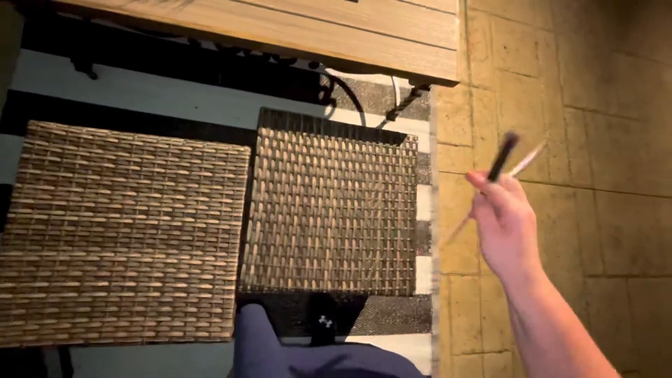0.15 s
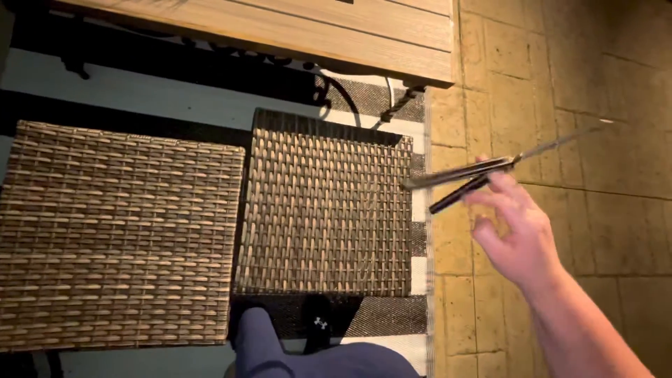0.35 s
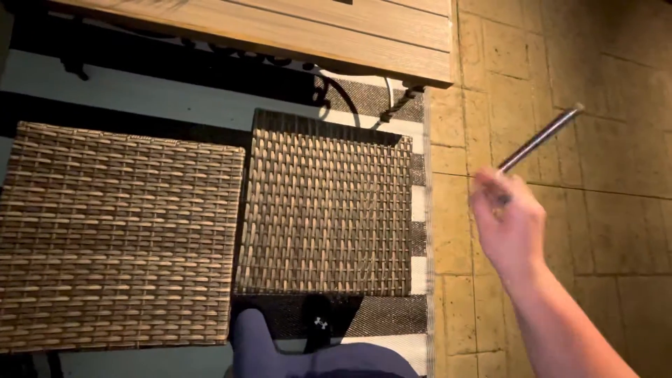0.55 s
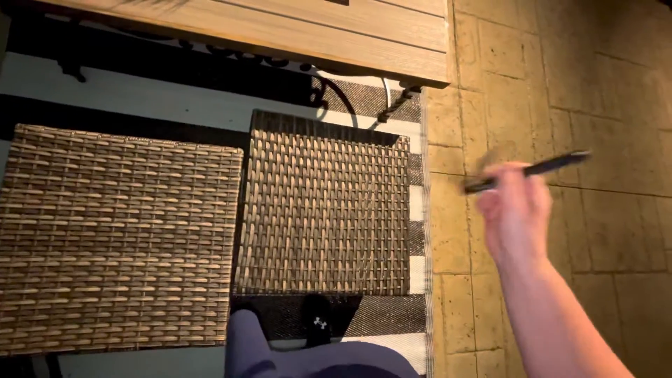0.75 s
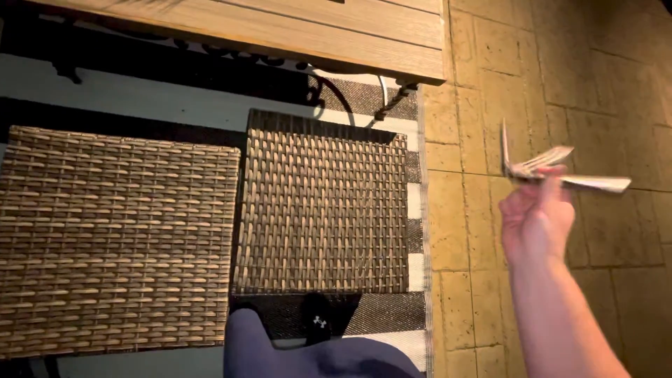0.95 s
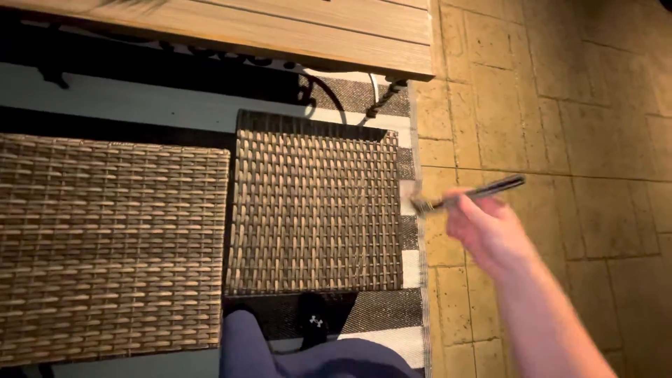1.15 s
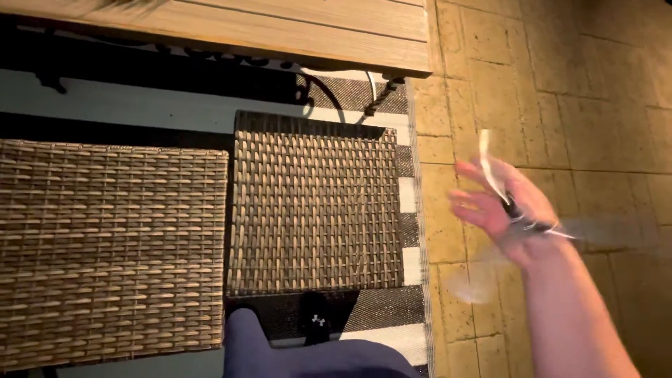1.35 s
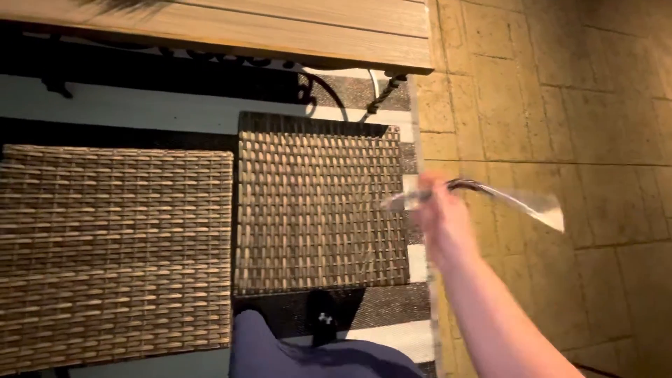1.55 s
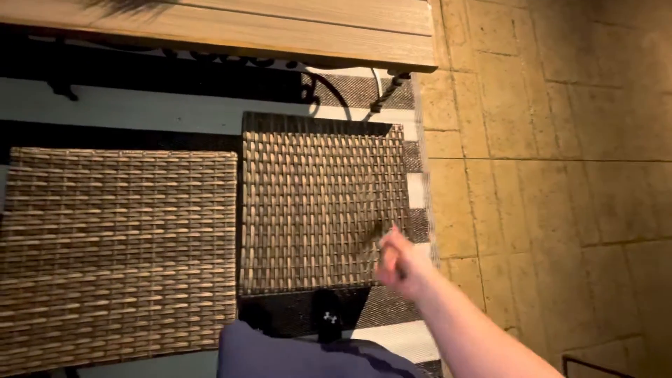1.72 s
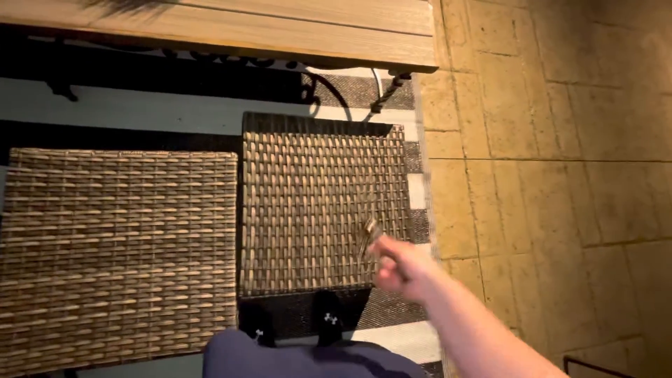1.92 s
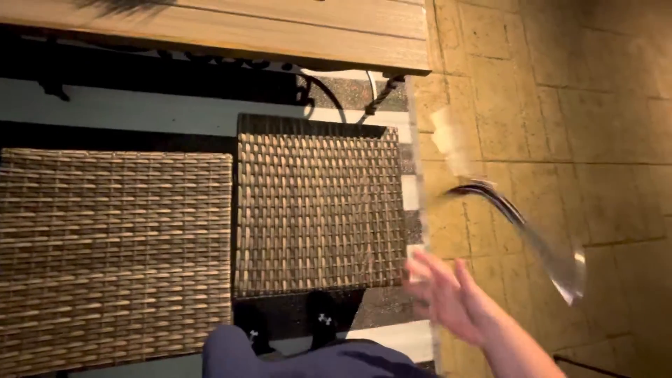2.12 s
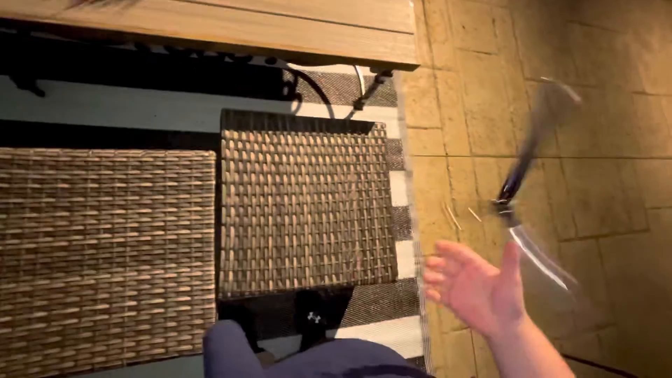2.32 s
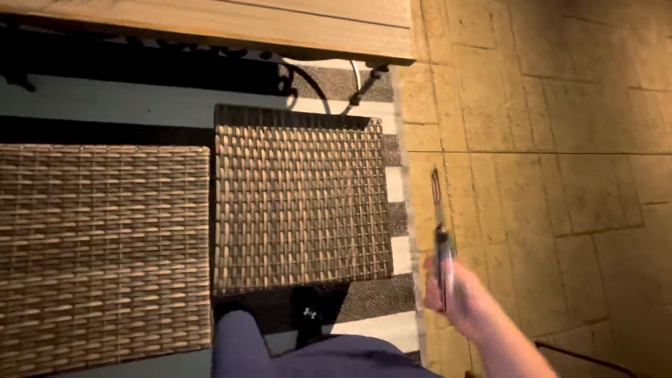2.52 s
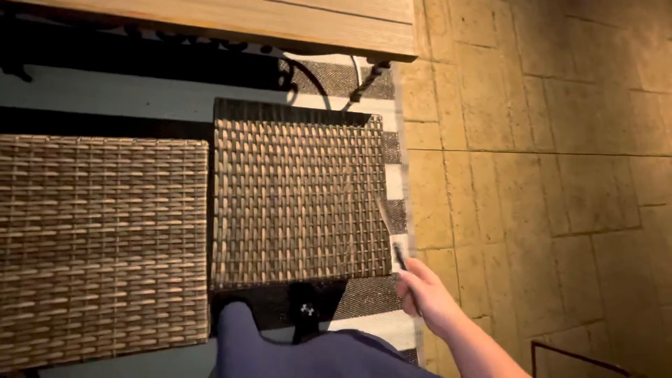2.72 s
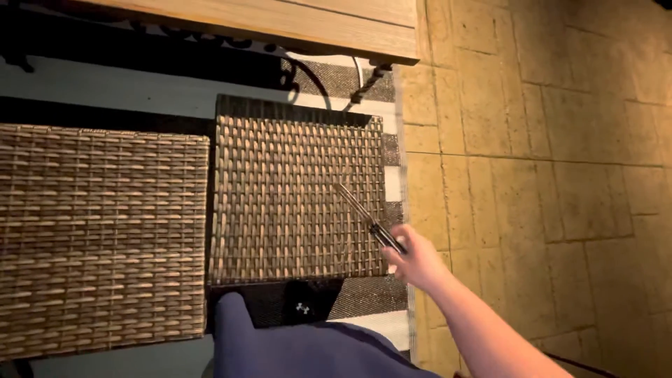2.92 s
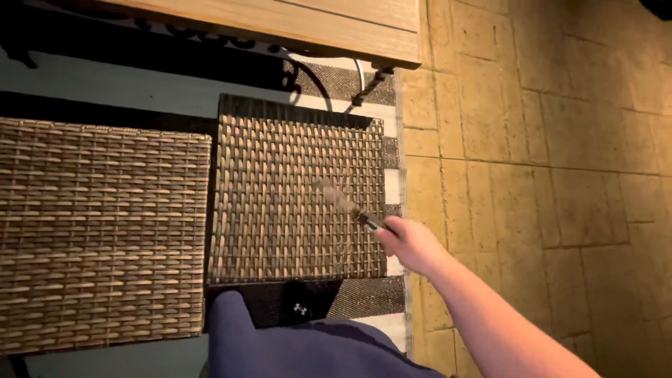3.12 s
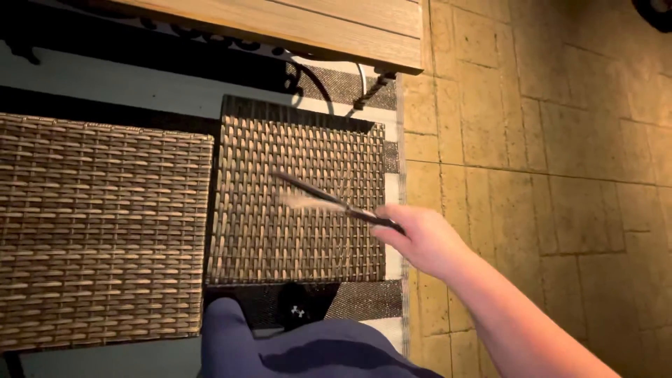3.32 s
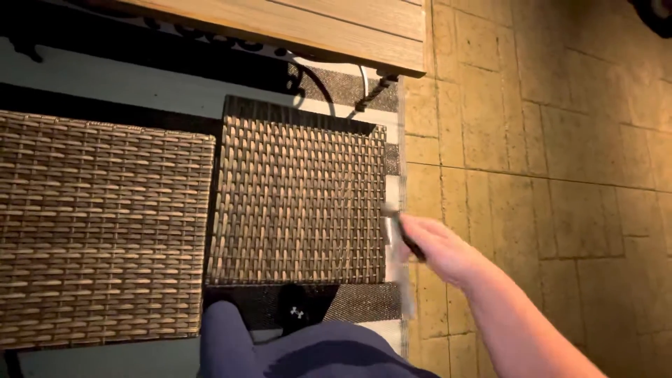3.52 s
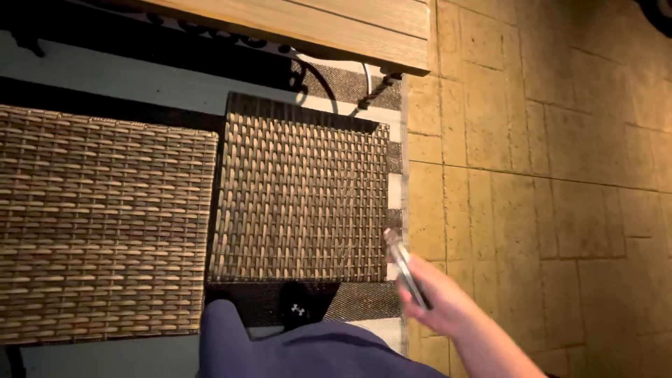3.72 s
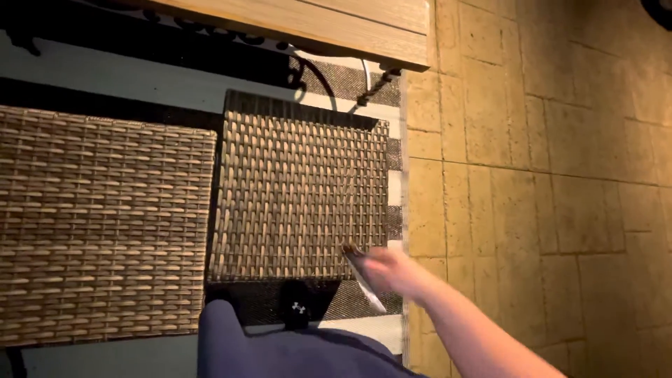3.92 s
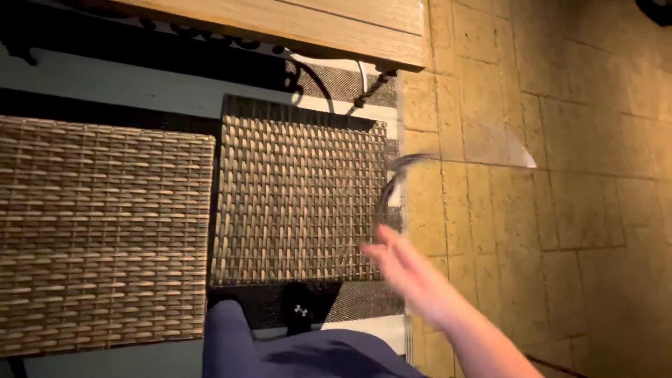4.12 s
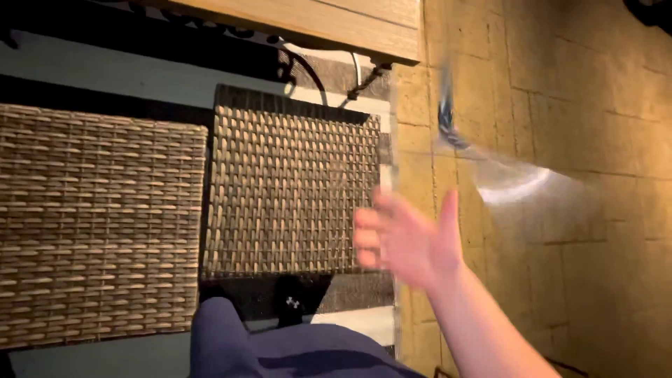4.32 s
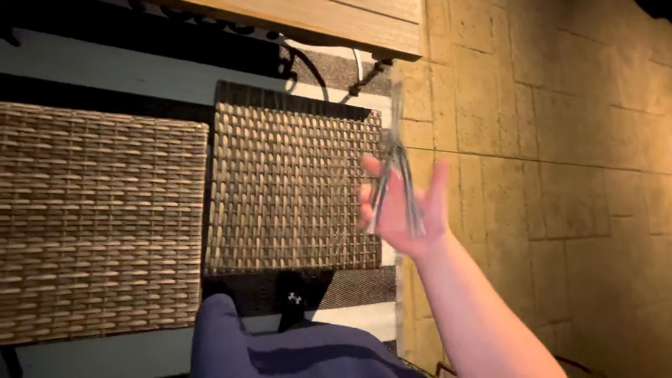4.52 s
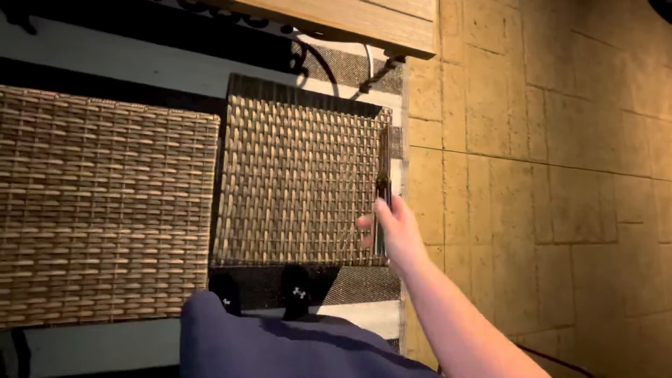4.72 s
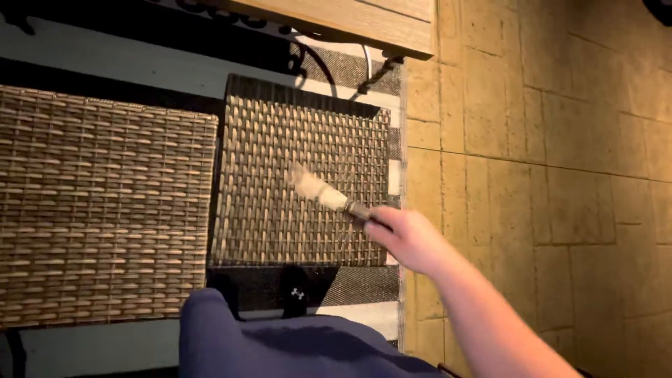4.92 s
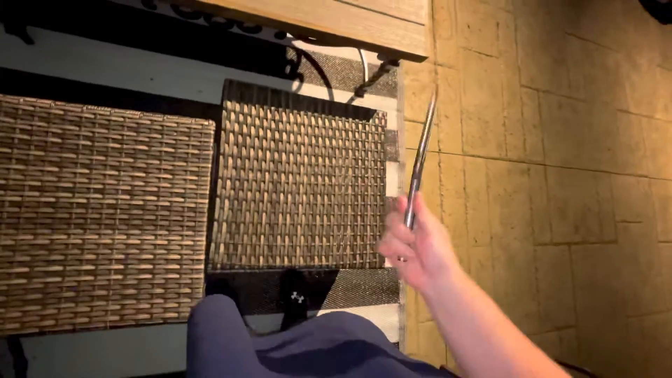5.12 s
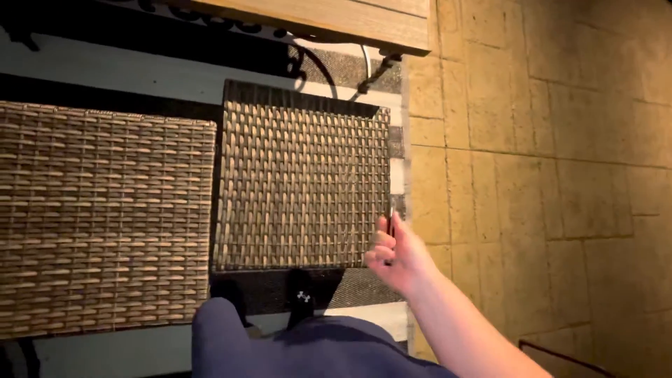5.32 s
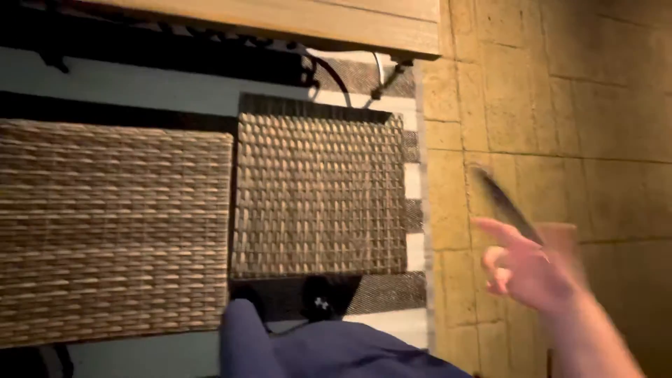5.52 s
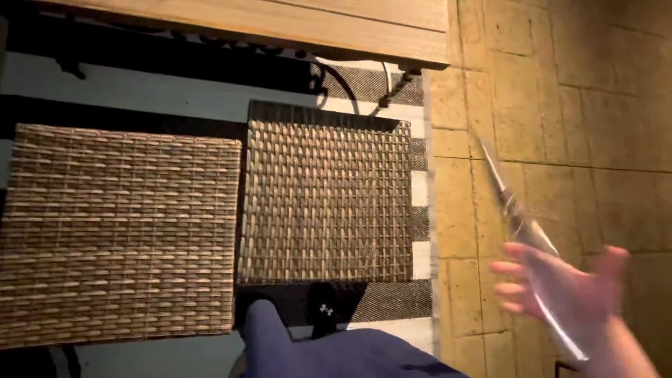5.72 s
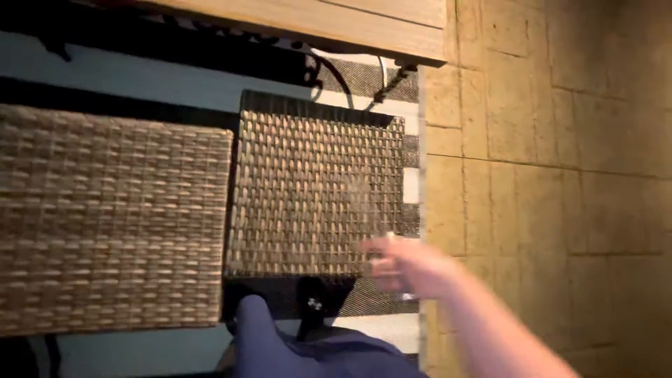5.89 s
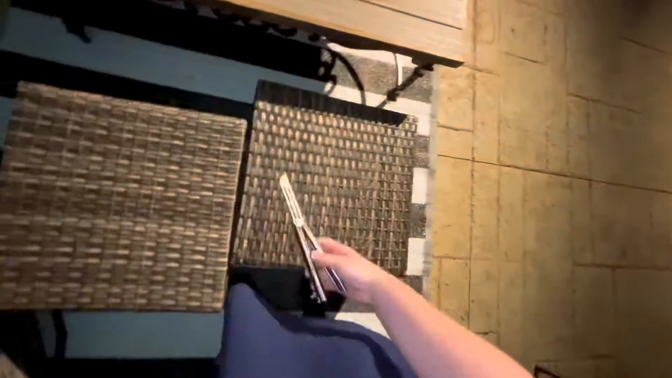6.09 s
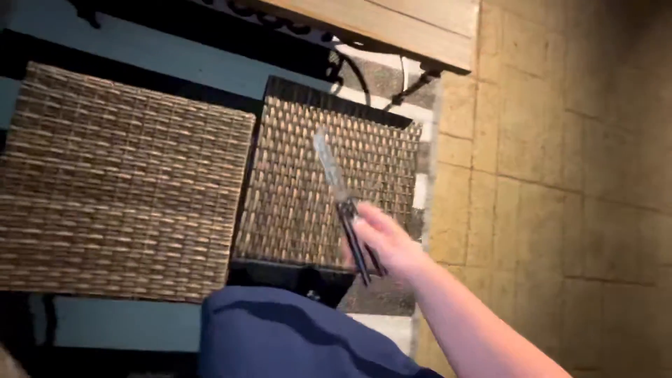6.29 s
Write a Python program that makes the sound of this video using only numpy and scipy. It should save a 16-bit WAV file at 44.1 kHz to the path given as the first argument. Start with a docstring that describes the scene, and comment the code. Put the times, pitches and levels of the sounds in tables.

```python
"""Butterfly knife on a patio

A butterfly knife is flipped and tossed by hand on a quiet covered patio, an arm's length from the microphone.
Clacks, chatter and palm catches are shaped noise bursts; metal contacts add short damped modes, the free blade long ones.
Filtered grainy noise makes the slides; decaying noise tails echo it all off paving, furniture and house front.
Below lie a low outdoor rumble, soft hiss and a distant hum: filtered noise and wavering sines.
"""
import sys
import numpy as np
from scipy import signal
from scipy.fft import rfft, irfft, next_fast_len
from scipy.io import wavfile
from scipy.ndimage import uniform_filter1d

SR = 44100
rng = np.random.default_rng(int(sys.argv[2]) if len(sys.argv) > 2 else 0)


def put_to_file(sound):
    """Save the sound as 16-bit audio at rate SR, in the file named by the first command-line argument."""
    columns = np.atleast_2d(sound).T  # one column per channel
    safe = np.clip(columns, -1, 1)
    whole_steps = np.round(safe * 32767)
    wavfile.write(sys.argv[1], SR, whole_steps.astype(np.int16))


N = 280035


# handle hits blade or handle: (time [s], strength [dB], crack re strength [dB], knock re strength [dB],
#                               steel chink over handle ring [dB], handle ring centre [Hz])
CLACKS = [(0.203, -41.5, -4, -4.5, 7.5, 2820), (0.2062, -42, 3, -12, 1.5, 2850),
          (0.2402, -31, -0.5, -6, 1.5, 2940), (0.247, -39, -8, -8.5, 5, 3340),
          (0.2725, -41.5, -1.5, -5, 0.5, 2860), (0.5204, -39.5, -8, -5, 7.5, 2650),
          (.525, -44, -2, -22, 9, 3120), (.7241, -31, -8.5, -20, 3.5, 2730),
          (1.8121, -56, 5, -0.5, -1.5, 3340), (2.459, -29.5, 5, -7, 16.5, 2780),
          (2.485, -20.5, 3, -9.5, 1.5, 2990), (2.4889, -26.5, -1.5, -18, 10, 3039),
          (2.4957, -22.5, 6, -13.5, 1, 3200), (2.5027, -18.5, -1.5, -15.5, 3, 3230),
          (2.5214, -28, 4.5, -7, -2, 3500), (2.5513, -34, 9.5, -9, 8, 3310),
          (2.5665, -34.5, 5.5, -8, 17, 3300), (2.5933, -36.5, 8, -10, 18, 3340),
          (3.5064, -48, -2.5, -8.5, -7.5, 2660), (3.6104, -25.5, 0, -12.5, 16, 2950),
          (3.625, -19, -7.5, -18.5, 0, 2920), (3.634, -35.5, 2.5, -21, 18, 3070),
          (3.6945, -43, -5, -14.5, 0, 2710), (4.4718, -34, 8, -5, 6, 2680),
          (4.5094, -21, -12, -17, 15, 3080), (4.5248, -23.5, 0, -14.5, 11, 3220),
          (4.5391, -28, 4.5, -6.5, 7, 2800), (4.5591, -29, -5.5, -9.5, 3.5, 3220),
          (4.586, -30.5, 0, -12, 1.5, 2430), (4.6047, -33, -10, -25, 8, 2820),
          (4.6132, -28.5, -2, -22, 9.5, 3080), (4.6467, -27, 0, -29, 12.5, 2680),
          (5.303, -51, 11.5, -16, 2, 3500), (5.3074, -23.5, -4.5, -22, -4.5, 3050),
          (5.5326, -32.5, 4, 4.5, 3, 3070), (5.6214, -36.5, 4.5, 1.5, 8.5, 2860),
          (5.873, -25.5, -2.5, -3.5, -5, 2810), (5.907, -17, -2, -26, 1.5, 3200),
          (5.9191, -19, -1.5, -12, 4, 2930), (5.9299, -24.5, 4, -20, -1.5, 3230),
          (5.9376, -23, 5, -10.5, -14.5, 2940), (5.947, -20, -2.5, -21.5, -12.5, 3180),
          (5.9679, -30.5, 1, -13.5, -2, 2860), (6.0529, -34, -7, -21, 4.5, 3020),
          (6.0701, -43, -9, -17.5, -2.5, 3300), (6.3043, -39.5, -11, -33, 2.5, 3180),
          (6.3248, -45.5, -5, -26, 0, 3170)]
# knife lands in the palm: (time [s], thud level [dB], knock level [dB])
CATCHES = [(2.4062, -40.5, -37.5), (3.6234, -35.5, -41), (4.4265, -41.5, -53), (5.3063, -39.5, -44.5),
           (5.8442, -43, -43.5)]
# loose handles chatter on their pivots: (start [s], length [s], level at start [dB])
RATTLES = [(2.488, .11, -33.5), (3.621, .02, -34), (4.514, .05, -35), (4.605, .03, -37),
           (5.907, .06, -38.5)]
CATCH_TICK_DB = -7.5  # metal tick re knock


def knife():
    """Soft catches in the palm, hard clacks and the chatter between them."""
    out = np.zeros((2, N))
    chatter = [row for run in RATTLES for row in rattle(*run)]
    blows = []
    for s, thud_db, knock_db in CATCHES:
        blows.append(emit(s, [impact(knock_db + CATCH_TICK_DB, knock_db, thud_db)]))
    for row in CLACKS + chatter:
        blows.append(clack(*row))
    for arrivals in blows:
        for s, sound in arrivals:
            add(out, s, sound)
    return out


# bending modes of the handles, damped by the grip: (frequency [Hz], relative level [dB], t60 [s])
HANDLE_MODES = [(2650, -8, 0.014), (2590, -5, 0.013), (2780, 0, 0.011), (2760, -4.5, 0.0073),
                (2816, -6, 0.016), (3120, 0, 0.017), (3400, -7, 0.0092), (3580, -2.5, .011)]
# higher modes of the steel parts: (frequency [Hz], relative level [dB], t60 [s])
STEEL_MODES = [(5560, -6.5, 0.0096), (6120, 1, 0.013), (6875, -3, 0.016), (6950, -0.5, 0.017),
               (7256, 1, 0.02), (7760, -3, 0.013), (8348, 2.5, 0.012), (8030, 4, 0.0026),
               (8535, -1.5, .012), (9000, 3, 0.0081), (8940, 1, 0.005), (9000, -6.5, 0.011),
               (10285, -0.5, 0.0095), (11640, -3.5, 0.045), (11780, -2, .035), (12600, -7, .025)]
MEDIUM_DB = -30  # reference strength
THUD_DB, THUD_GROWTH_DB_PER_DB = -52.5, .5  # the hand cushions hard blows
CHINK_HZ, CHINK_HZ_PER_DB = 7970, 29.5  # harder blows favour higher steel modes


def clack(s, db, crack_db, knock_db, chink_db, handle_hz):
    """Metal meets metal: faces crack and knock, energy divides between the handles' ring and the steel's chink."""
    force_db = db - MEDIUM_DB
    steel_hz = CHINK_HZ + CHINK_HZ_PER_DB * force_db
    handle_weight = favour(HANDLE_MODES, handle_hz, width_hz=170)
    steel_weight = favour(STEEL_MODES, steel_hz, width_hz=340)
    handle = ring(HANDLE_MODES, handle_weight, length_s=.05, detune=0.0099, spread=0.55,
                  scatter=0.6, rise_s=.0008)
    steel = ring(STEEL_MODES, steel_weight, length_s=.05, detune=0.0032, spread=0.73,
                 scatter=0.18, rise_s=0.00049)
    thud_db = THUD_DB + THUD_GROWTH_DB_PER_DB * force_db
    noise = impact(db + crack_db, db + knock_db, thud_db)
    return emit(s, [noise, struck(handle, db - chink_db / 2), struck(steel, db + chink_db / 2)])


RATTLE_PER_S, RATTLE_FADE_DB_PER_S, RATTLE_SCATTER_DB = 130, 110, 3.5
RATTLE_HZ, RATTLE_SPREAD_HZ = 3150, 250
RATTLE_CRACK_DB, RATTLE_KNOCK_DB, RATTLE_CHINK_DB = 1, -12.5, 0


def rattle(start_s, length_s, db, count=24):
    """Light, uneven contacts that die away, as rows like those of CLACKS; at most count."""
    rows = []
    for k, (jitter, size, pitch) in enumerate(rng.standard_normal((count, 3))):
        t = (k + .5 + .25 * jitter) / RATTLE_PER_S
        if t < length_s:
            strength_db = db - RATTLE_FADE_DB_PER_S * t + RATTLE_SCATTER_DB * size
            handle_hz = RATTLE_HZ + RATTLE_SPREAD_HZ * pitch
            rows.append((start_s + t, strength_db,
                         RATTLE_CRACK_DB, RATTLE_KNOCK_DB, RATTLE_CHINK_DB, handle_hz))
    return rows


# spectrum of the cracking faces: (frequency [Hz], relative level [dB])
CRACK = [(1200, -23.5), (2200, -4.5), (3000, 1), (4100, 0.5), (4700, -1.5), (6000, 0.5), (8500, -7.5),
         (9800, -10), (12300, -11), (13200, -19), (15500, -20), (16500, -35.5)]
# spectrum of the hollow knock: (frequency [Hz], relative level [dB])
KNOCK = [(400, -19.5), (750, -6), (1150, 2.5), (1600, -0.5), (2200, -4.5), (3200, -18.5), (6000, -41.5)]
# spectrum of the thud into the hand: (frequency [Hz], relative level [dB])
THUD = [(100, -21.5), (250, -4), (450, 0), (750, -3), (1300, -17.5), (4000, -50)]


def impact(crack_db, knock_db, thud_db):
    """The noise of a blow: a crack of the faces, a hollow knock and a thud into the hand."""
    crack = burst(CRACK, t60=0.011, rise_s=0.00045, apart=0.6)
    knock = burst(KNOCK, t60=0.0064, rise_s=.0008, apart=0.97, push=0.97)
    thud = burst(THUD, t60=.015, rise_s=.0008, apart=0.7, push=0.73)
    return struck(crack, crack_db) + struck(knock, knock_db) + struck(thud, thud_db)


def burst(spectrum, t60, rise_s, apart, push=0):
    """Two faces meet: dense chatter that dies quickly, with one solid push if push > 0."""
    t = np.arange(SR // 20) / SR
    force = pair(len(t), apart) * (1 - np.exp(-t / rise_s)) * fade(t, t60)
    force[:, int(rise_s * SR)] += push * np.sqrt((force ** 2).sum(1).mean())
    return colour(force, spectrum)


# where the knife is held: (time [s], left minus right [dB])
POSITION = [(.25, 3), (.72, -0.5), (2.5, 5), (3.6, 5.5), (4.5, 2.5), (5.3, 6.5), (5.55, 0), (5.9, 3.5),
            (6.3, 9)]
PAVING_S, PAVING_SPREAD_S = .0043, 0.00043  # first reflection: mean delay, its spread
PAVING_DB, PAVING_PAN_DB = -11.5, 8  # level re direct, extra left minus right


def emit(s, parts):
    """Sounds leave the knife at time s and arrive twice: directly and off the paving."""
    pan_db = np.interp(s, *np.transpose(POSITION))
    late_s = s + PAVING_S + PAVING_SPREAD_S * rng.standard_normal()
    direct = [(s, placed(part, pan_db)) for part in parts]
    paving = [(late_s, undb(PAVING_DB) * placed(part, pan_db + PAVING_PAN_DB)) for part in parts]
    return direct + paving


# blows after which the blade swings free and sings on: (time [s], level [dB], favoured pitch [Hz])
SINGS = [(0.2407, -55, 9280), (2.5213, -43, 11800), (2.5933, -58, 9300), (5.307, -47, 11700),
         (5.533, -49, 11500), (5.6214, -64, 9300)]
# modes of the free blade: (frequency [Hz], relative level [dB], t60 [s])
BLADE_MODES = [(7550, -2, .16), (8500, -8.5, .18), (9200, -3.5, 0.36), (11700, -4, .13)]


def blade():
    """The thin, long ring of the blade while nothing holds it: lightly damped modes."""
    out = np.zeros((2, N))
    for s, db, hz in SINGS:
        weight = favour(BLADE_MODES, hz, width_hz=200)
        song = ring(BLADE_MODES, weight, length_s=0.5, detune=0.00017, spread=1.0)
        add(out, s, struck(song, db))
    return out * undb([[2.5], [-2.5]])


def ring(modes, weight, length_s, detune, spread, scatter=0.36, rise_s=.0005):
    """Modes start nearly in step, then drift apart; each blow detunes them, each port hears its own phase."""
    hz, db, t60 = np.transpose(modes)[:, :, None]
    t = np.arange(int(length_s * SR)) / SR
    chance = rng.standard_normal((3, len(modes), 1))
    phase = 2 * np.pi * hz * (1 + detune * chance[0]) * t + scatter * chance[1]
    size = weight * undb(db) * fade(t, t60) * (1 - np.exp(-(t / rise_s) ** 2))
    return np.array([(size * np.sin(phase + side * spread * chance[2])).sum(0) for side in (1, -1)])


def favour(modes, centre_hz, width_hz):
    """The place of the blow favours the modes near one pitch."""
    return 1 / np.hypot(1, (np.array(modes)[:, :1] - centre_hz) / width_hz)


# handles slide in the hand and on their pivots:
# (middle [s], half span [s], rms level before the swell window [dB], low-pass [Hz])
SLIDES = [(0.975, 0.16, -74.5, 13500), (1.301, 0.035, -77, 8040), (1.638, 0.13, -67, 10700),
          (1.838, 0.045, -66, 6970), (2.047, 0.045, -69, 9060), (2.82, 0.059, -75.5, 7050),
          (3.182, .02, -69, 6860), (3.32, .1, -80, 9500), (3.55, 0.038, -68, 7000),
          (3.757, 0.067, -67.5, 10100), (3.944, .06, -75, 8550), (4.091, 0.069, -65, 10200),
          (5.093, 0.061, -71.5, 5480), (5.469, .03, -62, 11000), (5.48, .09, -62.5, 3500)]
# spectrum of the sliding grains: (frequency [Hz], relative level [dB])
SLIDE = [(1000, -11), (2500, -7.5), (5000, -7), (7500, -7), (10000, -7.5), (13500, 3), (15500, -21.5)]
# slide into the grip around each catch: half span, level before the window, low-pass
SETTLE_S, SETTLE_DB, SETTLE_HZ = .05, -60.5, 9060


def slides():
    """Metal sticks and slips on skin and pivot: a grainy swish that swells and fades, also around each catch."""
    out = np.zeros((2, N))
    grip = undb(3.2 * walk(150))
    settling = [(s + SETTLE_S / 2, SETTLE_S, SETTLE_DB, SETTLE_HZ) for s, _, _ in CATCHES]
    for s, half_s, db, top_hz in SLIDES + settling:
        size = int(2 * half_s * SR)
        grains = colour(pair(size, apart=1.0) * undb(6 * rng.standard_normal(size)), SLIDE)
        lowpass = signal.butter(3, min(top_hz, .45 * SR), fs=SR, output="sos")
        rub = signal.sosfilt(lowpass, grains)
        add(out, s - half_s, unit(rub) * np.hanning(size) ** 2 * undb(db))
    return out * unit(grip) * undb([[2.5], [-2.5]])


# colour of the patio's reflections: (frequency [Hz], gain [dB])
ECHO = [(200, -5), (1000, 1), (3000, 2), (7500, 2), (10000, -1), (12500, 2.5), (13500, -8.5),
        (16000, -15.5)]


def patio(x, near_db, near_t60, walls_db, walls_t60, far_db, far_t60):
    """Hand and body reflect first, paving and furniture soon after, the house front last."""
    t = np.arange(SR // 2) / SR

    def echoes(db, t60, delay_s, apart):
        """One dense, decaying group of reflections."""
        tail = pair(len(t), apart) * fade(t, t60) * (t > delay_s)
        return undb(db) * tail / np.sqrt((tail ** 2).sum(1, keepdims=True))

    near = colour(echoes(near_db, near_t60, delay_s=0.0033, apart=0.5), ECHO)
    walls = echoes(walls_db, walls_t60, delay_s=0.0089, apart=1.0)
    far = echoes(far_db, far_t60, delay_s=0.022, apart=1)
    diffuse = colour(walls + far, ECHO)
    near_wet = signal.fftconvolve(x, near, axes=1)
    # the diffuse sound has lost most of its direction
    diffuse_wet = signal.fftconvolve(x.mean(0, keepdims=True), diffuse, axes=1)
    return (near_wet + undb([[1.2], [-1.2]]) * diffuse_wet)[:, :N]


# the recorder's body shades the two ports differently: (frequency [Hz], left minus right [dB])
SHADE = [(1000, 2), (3000, 4.5), (4300, 9.5), (5700, 5.5), (7200, 3), (8700, 0.5), (10000, -7.5),
         (13000, -0.5)]


def at_ports(x, count=1):
    """The recorder's body colours each port; the left one hears the knife count samples later."""
    left = colour(x[0], [(hz, db / 4) for hz, db in SHADE])
    right = colour(x[1], [(hz, -3 * db / 4) for hz, db in SHADE])
    return np.array([np.pad(left, (count, 0))[:N], right])


# outdoor noise spectrum: (frequency [Hz], relative density [dB])
AIR = [(20, -32.5), (35, -23), (50, -5.5), (70, 1), (95, -5.5), (130, -10.5), (180, -15), (330, -25),
       (900, -28), (1300, -33), (1900, -37), (2600, -54.5), (8000, -62.5), (12500, -65), (16000, -79.5)]
# rumble level: (time [s], level [dB])
RUMBLE = [(0, -50), (.38, -54), (0.901, -46.5), (1.45, -47), (1.6, -50), (3.7, -47.5), (6.35, -50)]
# distant machinery; tones below 130 Hz join the rumble and take its swell:
# (frequency [Hz], level in the raw mix [dB])
HUM = [(63.5, -54), (78, -57), (479, -72.5), (824, -75.5)]
AIR_DB, RUMBLE_SWELL_DB = -49.5, 0.3  # raw mix level of the noise, random swell


def outdoors():
    """Filtered noise gives a swelling rumble nearly alike at both ports and soft hiss; wavering sines hum."""
    mid, side = (colour(rng.standard_normal(N), AIR) for _ in range(2))
    side = colour(side, [(60, -19), (125, -12.0), (250, -7), (500, 2.5), (1500, 1.0)])
    air = (mid + np.array([side, -side])) * undb(AIR_DB) / mid.std()
    t = np.arange(N) / SR
    for hz, db in HUM:
        drift = 2 * np.pi * np.cumsum(2.5 * walk(3.8)) / SR
        tone = undb(4 * walk(4.7)) * np.sin(2 * np.pi * hz * t + drift)
        air = air + undb(db) * unit(tone)
    low = signal.sosfiltfilt(signal.butter(2, 130, fs=SR, output="sos"), air)
    s, db = np.transpose(RUMBLE)
    swell = undb(np.interp(t, s, db) + RUMBLE_SWELL_DB * walk(6))
    rumble = unit(low) * swell
    rest = (air - low) * undb(.6 * walk(3.2))
    return (rumble + rest) * undb([[-.6], [.6]])


def undb(db):
    """Decibels to gain."""
    return 10 ** (np.asarray(db) / 20)


def unit(x):
    """Scale to rms 1."""
    return x / np.sqrt(np.mean(x ** 2))


def colour(x, points):
    """Minimum-phase filter with the given (Hz, dB) response, built by folding the cepstrum."""
    size = 2 * next_fast_len(x.shape[-1] // 2 + 1024)
    hz, db = np.transpose(points)
    bins_hz = np.fft.rfftfreq(size, 1 / SR)
    log_gain = np.log(undb(np.interp(np.log(bins_hz + 1), np.log(hz), db)))
    cepstrum = irfft(log_gain)
    cepstrum[1:size // 2] *= 2
    cepstrum[size // 2 + 1:] = 0
    return irfft(rfft(x, size) * np.exp(rfft(cepstrum)), size)[..., :x.shape[-1]]


def walk(rate_hz):
    """Slow random drift of rms 1: smoothed random steps."""
    k = int(SR / rate_hz)
    steps = np.repeat(rng.standard_normal(N // k + 1), k)
    return unit(uniform_filter1d(uniform_filter1d(steps, k), k)[:N])


def fade(t, t60):
    """Exponential decay, 60 dB in t60 seconds."""
    return np.exp(-np.log(1000) * t / t60)


def pair(size, apart):
    """Noise at the two microphone ports: a shared part plus an opposed part."""
    mid, side = rng.standard_normal((2, size))
    return mid + apart * np.array([side, -side])


def add(out, s, sound):
    """Mix a sound in at time s."""
    i = max(int(s * SR), 0)
    out[:, i:i + sound.shape[1]] += sound[:, :max(N - i, 0)]


def struck(x, db):
    """Set the rms level of a blow's first 4 ms."""
    return x * undb(db) / np.sqrt(np.mean(x[:, :SR // 250] ** 2))


def placed(sound, pan_db):
    """Share a sound between the ports, left minus right in dB."""
    return sound * unit(undb(np.array([[pan_db], [-pan_db]]) / 2))


def scene():
    """The knife and its echoes over the outdoor background."""
    background = outdoors()
    close = blade() + slides() + knife()
    echoes = patio(close, near_db=-14, near_t60=.04, walls_db=-11.5, walls_t60=.124,
                   far_db=-30, far_t60=.34)
    return at_ports(close + echoes) + background


TOP_HZ = 16100


def record(dry):
    """The recorder rounds the highest peaks and cuts the top."""
    lowpass = signal.ellip(8, .2, 70, TOP_HZ, fs=SR, output="sos")
    return signal.sosfilt(lowpass, np.tanh(dry))


dry = scene()
out = record(dry)
put_to_file(out)
```